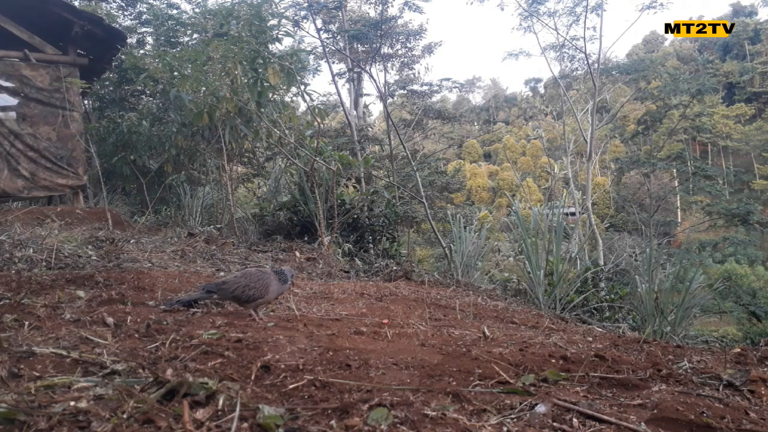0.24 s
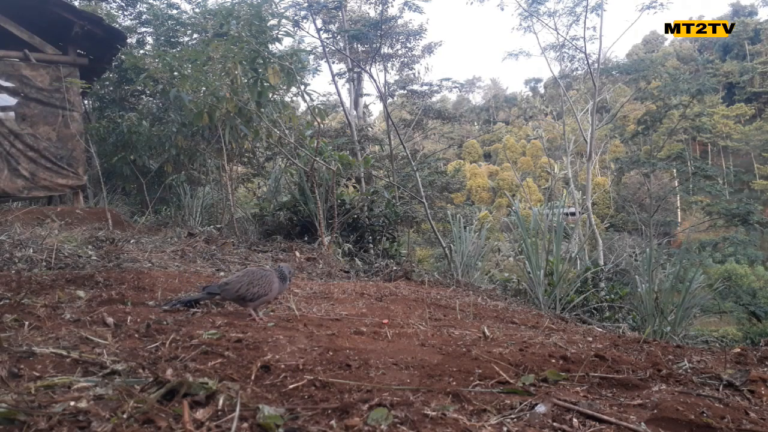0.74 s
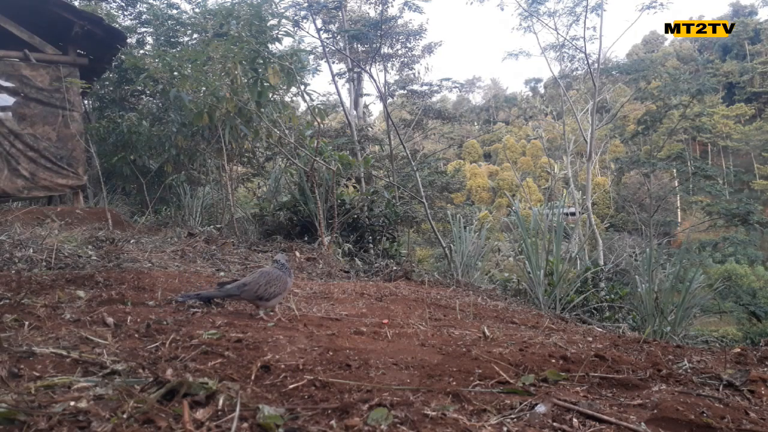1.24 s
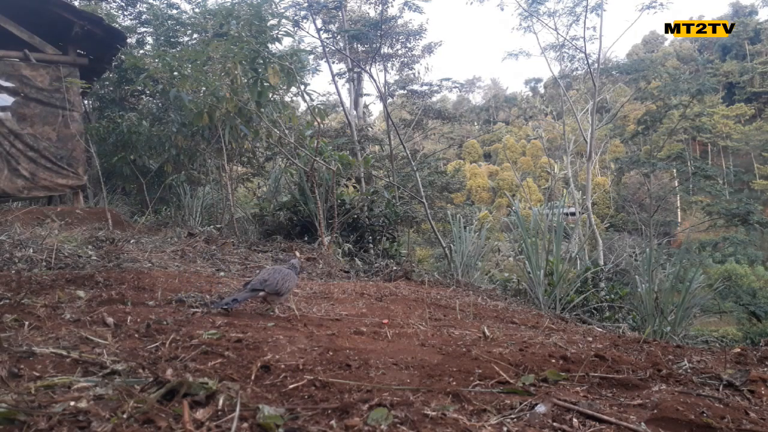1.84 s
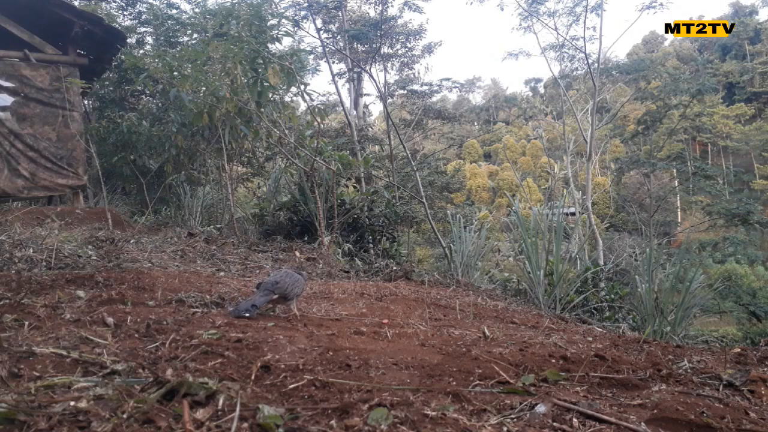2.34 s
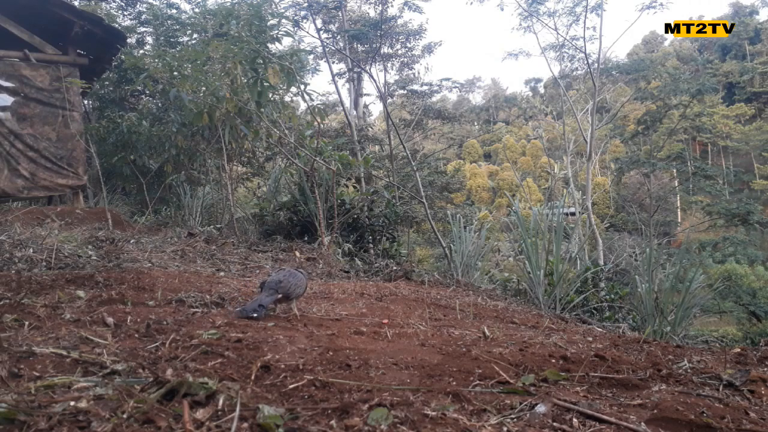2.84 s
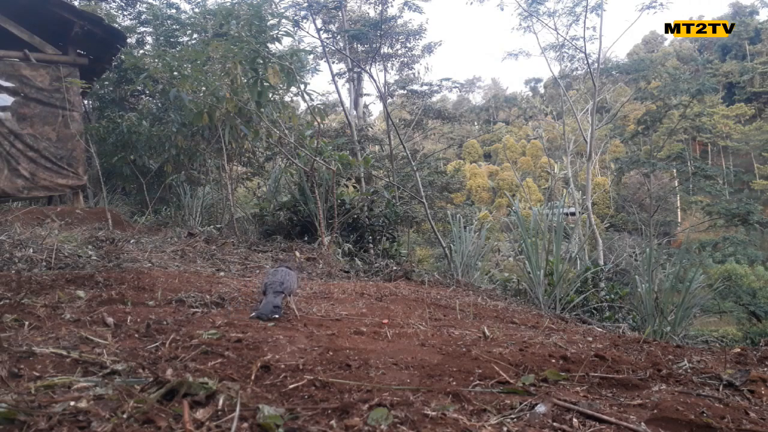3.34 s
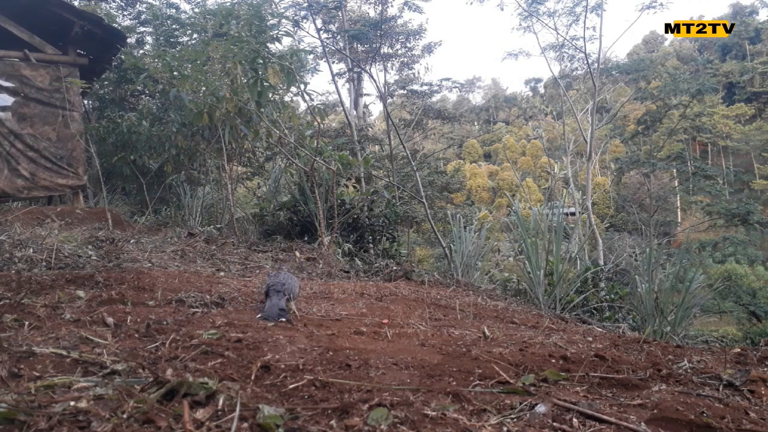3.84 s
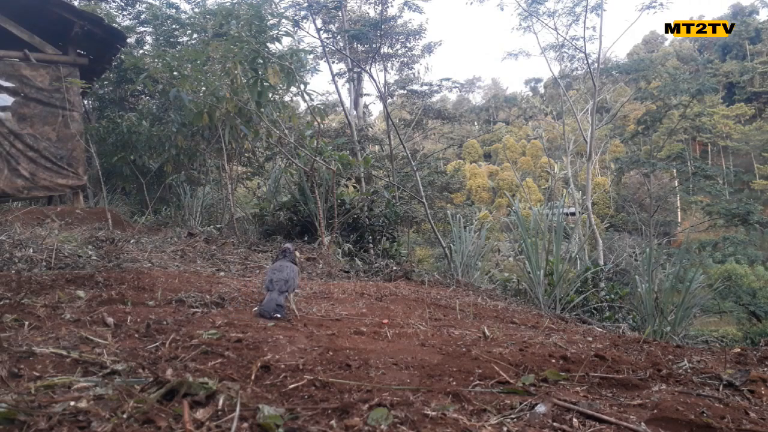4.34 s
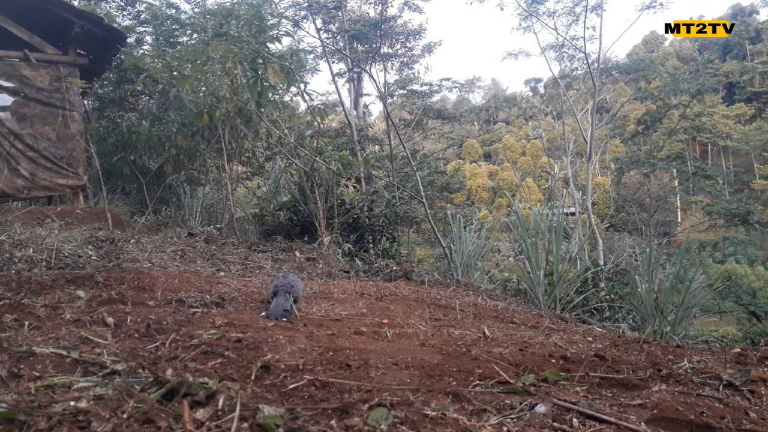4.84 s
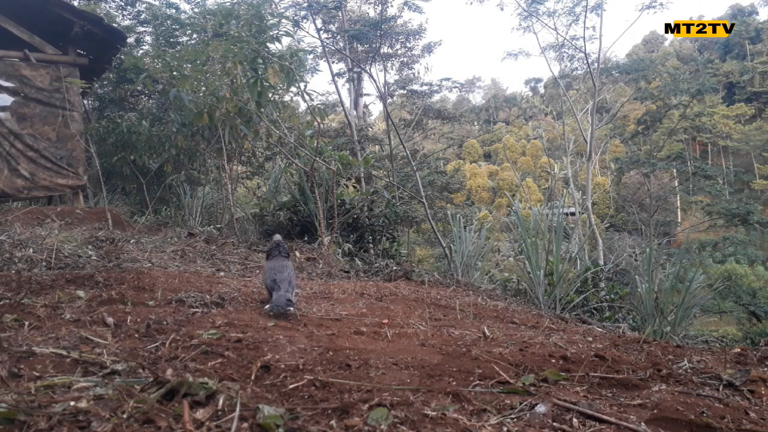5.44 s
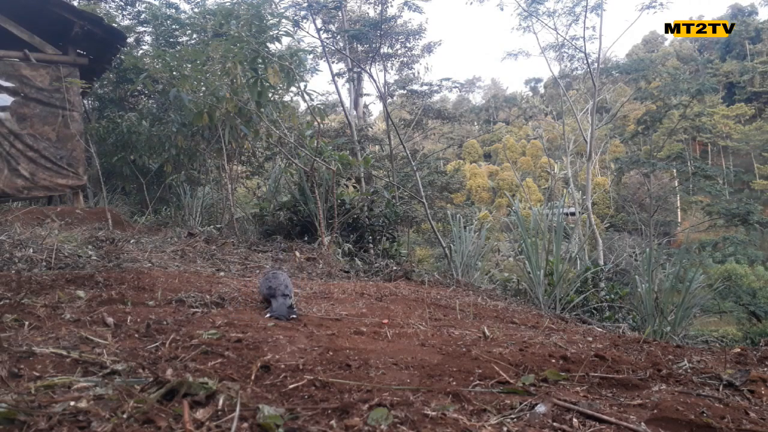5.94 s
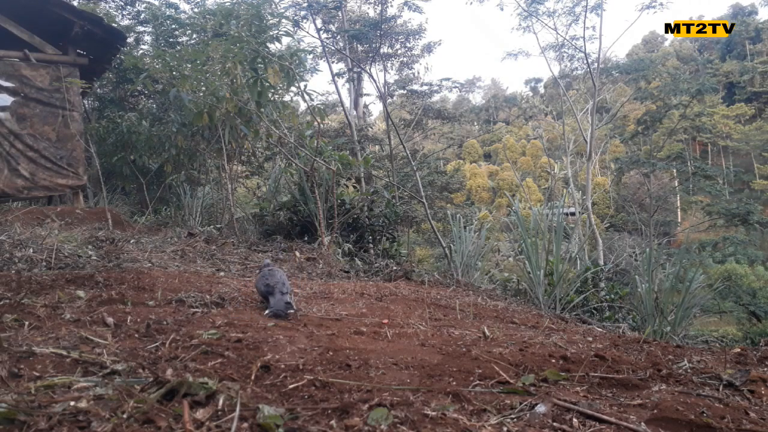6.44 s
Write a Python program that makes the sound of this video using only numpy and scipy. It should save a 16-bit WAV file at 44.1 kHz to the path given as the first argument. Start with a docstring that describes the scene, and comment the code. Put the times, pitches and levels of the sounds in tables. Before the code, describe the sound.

Mellow fluttering dove coos sound near on a quiet wooded hillside, with far doves, thin whistles and trills, buzzing insects and a dying engine putter.

```python
"""On bare ground at the edge of a wooded hillside a dove coos and purrs, with more doves far off.
A distant one-cylinder engine putters, slows and fades; small birds whistle, trill, chirp and pipe.
Insects buzz in the trees, over soft outdoor air. Voices are gliding tones, the engine is a row of
thumps, and insects and air are shaped noise. Scattered echoes set most sources among the trees."""
import sys
import numpy as np
from scipy import signal
from scipy.fft import rfft, irfft
from scipy.io import wavfile

SR = 44100
rng = np.random.default_rng(int(sys.argv[2]) if len(sys.argv) > 2 else 0)


def generate_wav(sig):
    """Save sig (samples, or channels by samples) to the path in sys.argv[1] as 16-bit PCM at SR."""
    pcm = np.round(np.clip(np.atleast_2d(sig).T, -1, 1) * 32767).astype(np.int16)
    wavfile.write(sys.argv[1], SR, pcm)


N = 294588
TIME = np.arange(N) / SR   # seconds

# colour of the open air, relative: (f/Hz, level per Hz/dB)
AIR_COLOUR = [(20, -41), (45, -15.5), (60, -5.5), (80, -11), (150, -2), (240, -2.5), (340, -8.5),
              (560, -0.5), (950, -16), (1250, -20), (1650, -16), (2600, -23.5), (3800, -29), (5500, -32),
              (8500, -37.5), (10500, -45.5), (15000, -40.5)]
# steady insect chorus, one row per resonance: (f/Hz, width/Hz, level/dB)
CHORUS_BANDS = [(3096, 465, -64), (4580, 436, -65), (6340, 800, -72), (9090, 820, -78)]
# resonances of the insect buzz: (f/Hz, width/Hz, relative level/dB)
BUZZ_RESONANCES = [(6290, 510, 3), (7770, 510, -0.5)]
# murmur of far doves, joined by straight lines: (t/s, relative level/dB, f/Hz)
FAR_DOVE_PATH = [(0, -40, 670), (.94, -46.5, 699.7), (1.01, -40, 766), (1.08, -51, 750), (1.3, -45.5, 621),
                 (1.6, -50.5, 629), (1.8, -48, 679), (3.3, -49, 670), (4.4, -46, 666), (5.55, -54, 702.4),
                 (6.68, -55, 658.4)]
# thin notes of the piping bird: (t/s, length/s, relative level/dB)
PIPED_NOTES = [(0.296, 0.03, -58), (0.341, 0.071, -55), (0.452, 0.061, -58), (0.668, 0.042, -58),
               (1.158, 0.08, -55), (1.324, 0.033, -62), (1.987, 0.083, -56), (2.205, 0.028, -57.5),
               (2.248, 0.043, -62), (2.812, 0.078, -56.5), (3.059, 0.05, -56.5), (3.596, 0.112, -56.5),
               (3.717, 0.062, -56.5), (4.401, 0.12, -55), (5.182, 0.049, -56.5), (5.298, 0.09, -57),
               (5.452, 0.041, -60), (5.988, 0.041, -57.5), (6.119, 0.07, -57)]
# runs of the trilling bird: (start t/s, end t/s)
TRILL_RUNS = [(0, 0.28), (.559, 1.15), (1.507, 2.08), (2.48, 3.179), (3.801, 4.36), (4.68, 5.101), (5.4, 6),
              (6.327, 7.5)]
# notes of the whistling bird: (start t/s, held f/Hz, level/dB)
WHISTLE_NOTES = [(0.053, 4000, -51), (.623, 3990, -54.5), (1.185, 3940, -57), (1.795, 3960, -56.5),
                 (2.425, 3964, -55.5), (3.04, 3880, -52.5), (3.783, 3920, -52.5), (4.415, 3905, -57),
                 (5.12, 3855, -53), (6.375, 3915, -55.5)]
# engine exhaust: (t/s, level/dB, share of hillside echo/0-1)
ENGINE_PATH = [(0, -42.5, 0.1), (.28, -42, 0), (.62, -39.5, 0), (1.1, -45, 0.43), (1.52, -41.5, 0.47),
               (1.62, -44.5, 0.32), (1.84, -43, 0.84), (2.3, -48, .8), (3.0, -54.5, 0.8), (4.5, -67, 0.99)]
# engine speed: (t/s, firings per second/Hz)
ENGINE_SPEED = [(0.0, 29.7), (0.35, 30.1), (0.62, 28.9), (0.92, 30.63), (1.15, 29.67), (1.35, 26.68),
                (1.6, 28.89), (2.05, 21.77), (2.6, 16.5)]
# notes of the near dove: (start t/s, length/s, pitch rise/s, pitch fall/s,
#   bend of the fall (under 1 = steep at first), top f/Hz, sag before the fall/Hz, end f/Hz,
#   level/dB, attack/s, fade during the fall/dB, first flutter rate/Hz, last flutter rate/Hz,
#   purr from/s into the note, purr until/s into the note, purr depth/0-1, depth outside the purr/0-1)
COO_NOTES = [(.064, 0.21, 0.12, 0.05, 1.1, 731.5, 35, 527, -15.5, .083, 14, 62.3, 69.8, 0.0058, .088, .86, .06),
             (.409, .42, 0.025, 0.16, .58, 799, 69, 557, -17, 0.024, 8.5, 57.54, 70.1, 0.0029, 0.21, 0.79, 0.1997),
             (2.171, 0.12, 0.046, 0.067, .7, 748.5, 3.85, 573, -18.5, 0.026, 26, 55, 67.7, .034, .11, 0.86, 0.21),
             (2.326, .18, 0.093, 0.025, 1.17, 742.4, 33, 540, -17, .092, 3.5, 69, 73.44, 0.01, 0.1, 0.94, .04),
             (2.634, 0.51, 0.0356, 0.092, 0.67, 755.5, 76, 568, -18, 0.025, 9, 62.1, 106.4, 0.00085, 0.4, .85, 0.2),
             (3.515, .17, 0.038, 0.0258, 0.97, 734, 54, 569.3, -19.5, 0.018, 1, 76.3, 97.2, 0.0036, .153, .97, .15),
             (3.796, 0.37, 0.032, 0.12, 1, 704, 2.17, 605, -18.2, 0.028, 5.5, 117.4, 118.5, 0.0004, 0.19, 0.59, 0.39),
             (4.644, .183, .034, .02, 0.85, 723, 37, 559, -19, .024, 2, 68.8, 94, 0.00096, .15, 0.93, .05),
             (4.937, 0.56, 0.0459, .35, .85, 742.6, 37, 559.5, -18.5, 0.026, 17.5, 68, 73.9, 0.12, .37, 0.45, .2),
             (5.856, 0.17, 0.033, 0.036, 1.26, 716.6, 18.3, 589.3, -20, 0.017, 1, 82.1, 93.8, 0.0049, 0.15, 0.94, 0.76),
             (6.132, 0.55, 0.059, 0.31, 1.05, 736.6, 43, 563, -19, 0.025, 15.8, 65.15, 63.23, 0.13, 0.33, 0.52, .33)]

AIR_DB = -49
FIRST_BUZZ_S, BUZZ_EVERY_S, BUZZ_S = -.28, .815, .61   # evenly spaced bursts
FIRST_CHIRP_S, CHIRP_EVERY_S, CHIRP_DB = .335, .595, -58
TRILL_DB, WHISTLE_S = -63.5, .225
START_HZ = 561.4   # every coo starts here, before the purr pulls its pitch down
SWELL_DB = 2.5   # each coo grows by this much until its fall
RELEASE_S = .013   # the throat shuts
PURR_FADE_S, TREMOR_HZ = .022, 64   # the purr gives way to a shallower tremor
PURR_DRAG_HZ, PURR_LOSS_DB = 45.26, 2   # a full purr lowers pitch and loudness by this much
QUAVER_HZ, QUAVER_GROWS_S = 12.2, .22   # a coo's quaver grows to full over this time
CUTOFF_HZ = 15500


def from_db(db):
    """Turn decibels into gain."""
    return 10 ** (np.asarray(db) / 20)


def rms_one(x):
    """Scale to unit power."""
    return x / np.sqrt(np.mean(x ** 2) + 1e-20)


def in_time(rows):
    """Give one curve per column after the first, joining the rows by straight lines."""
    t, *columns = np.transpose(rows)
    return [np.interp(TIME, t, column) for column in columns]


def band(x, low_hz, high_hz, order=2):
    """Keep the sound between two frequencies."""
    edges_hz = [max(low_hz, 10), min(high_hz, .45 * SR)]
    sos = signal.butter(order, edges_hz, "band", fs=SR, output="sos")
    return signal.sosfilt(sos, x + 1e-18)


def hiss(hz, width_hz):
    """Make noise in one resonance, at unit power."""
    return rms_one(band(rng.standard_normal(N), hz - width_hz / 2, hz + width_hz / 2))


def drift(rate_hz):
    """Wander smoothly at random with a spread of 1, faster for a higher rate."""
    r = np.exp(-40 * np.pi * rate_hz / SR)
    # worked out at every 20th sample; the first 2000 values let the filter settle
    noise = rng.standard_normal(N // 20 + 2002)
    slow = signal.lfilter([1], [1, -2 * r, r * r], noise)[2000:]
    return np.interp(np.arange(N) / 20, np.arange(len(slow)), rms_one(slow))


def turns(hz):
    """Count the cycles completed at a changing frequency."""
    return np.cumsum(hz) / SR


def woods(x, t60):
    """Trunks and slopes scatter thin echoes that die by 60 dB in t60 seconds."""
    t = TIME[:SR]
    scattered = rng.standard_normal(SR) * (rng.random(SR) < 900 / SR)   # about 900 echoes
    echoes = scattered * (t > .015) * from_db(-60 * t / t60)
    return signal.fftconvolve(x, echoes / np.sqrt(np.sum(echoes ** 2)))[:N]


def air(engine_hiss_db=-17, hiss_hz=1700, hiss_width_hz=1700):
    """Coloured noise gives a soft rumble and hiss; the engine's own hiss sinks as it slows and fades."""
    hz, db = np.transpose(AIR_COLOUR)
    bin_hz = np.arange(N // 2 + 1) * SR / N
    colour = from_db(np.interp(np.log(bin_hz + 1), np.log(hz), db))
    steady = from_db(AIR_DB) * rms_one(irfft(rfft(rng.standard_normal(N)) * colour, N))
    rate, level_db = in_time(ENGINE_SPEED)[0], in_time(ENGINE_PATH)[0]
    engine_level = from_db(level_db + engine_hiss_db) * (rate / rate.max()) ** 2
    return steady + engine_level * hiss(hiss_hz, hiss_width_hz)


def insects(buzz_db=-69, climb_hz=300, throb_hz=57, throb_depth=0.098):
    """A throbbing noise swells and climbs in bursts, low between them, over a steady chorus."""
    age = (TIME - FIRST_BUZZ_S) % BUZZ_EVERY_S
    part = age / BUZZ_S * (age < BUZZ_S)   # 0 to 1 through a burst, 0 between bursts
    swell = np.interp(part, [0, .3, .85, 1], [0.35, 0.74, 0.77, 0.2])
    resonances = sum(from_db(db) * hiss(hz, width) for hz, width, db in BUZZ_RESONANCES)
    # this slides all the frequencies up together
    climb = np.exp(2j * np.pi * turns(climb_hz * (part - .5)))
    buzz = np.real(climb * signal.hilbert(resonances))
    throb_phase = 2 * np.pi * turns(throb_hz * (1 + .03 * drift(5.8)))
    throb = 1 + throb_depth * np.sin(throb_phase)
    chorus = sum(from_db(db) * hiss(hz, width) for hz, width, db in CHORUS_BANDS)
    return from_db(buzz_db) * swell * buzz * throb + chorus


def far_doves(flutter_hz=66, depth=1.0, wander=0.0254, gain_db=-1):
    """A fluttering tone with wandering pitch makes a purr from far away, blurred by the trees."""
    level_db, pitch = in_time(FAR_DOVE_PATH)
    flutter = turns(flutter_hz * (1 + 0.1655 * drift(26)))
    purr = 1 + depth * np.sin(2 * np.pi * flutter)
    voice = purr * np.sin(2 * np.pi * turns(pitch * (1 + wander * drift(31.7))))
    return from_db(level_db + gain_db) * rms_one(voice + woods(voice, t60=0.64))


def piper(hz=1463, waver_hz=8, gain_db=3, edge_s=0.011, fundamental_db=-14, thread_db=-69, echo_db=-6):
    """Short notes on one pitch, strongest in their octave, over a faint wavering thread of that tone."""
    level = np.zeros(N)
    for start, length, db in PIPED_NOTES:
        inside_s = length / 2 - abs(TIME - start - length / 2)   # time from the nearer end
        level += from_db(db + gain_db) * np.clip(.5 + inside_s / edge_s, 0, 1)
    level = level + from_db(thread_db + 2.9 * drift(11))
    phase = 2 * np.pi * turns(hz + waver_hz * drift(40.8))
    notes = level * (np.sin(2 * phase) + from_db(fundamental_db) * np.sin(phase))
    return notes + from_db(echo_db) * woods(notes, t60=1.0)


def chirper(count=6, length_s=0.069, low_hz=2400, high_hz=3300, echo_db=-8):
    """A rising, quavering tone makes quick chirps at an even pace, deep in the trees, then stops."""
    out = np.zeros(N)
    for start in FIRST_CHIRP_S + CHIRP_EVERY_S * np.arange(count):
        part = np.clip((TIME - start) / length_s, 0, 1)
        hz = low_hz + (high_hz - low_hz) * part + 130 * np.sin(5 * np.pi * part)
        out += from_db(CHIRP_DB) * np.sin(np.pi * part) * np.sin(2 * np.pi * turns(hz))
    return out + from_db(echo_db) * woods(out, t60=0.48)


def triller(chips_hz=18.6, centre_hz=4690, sweep_hz=120, rasp_hz=160, echo_db=-6):
    """Runs of quick, falling chips grow louder, raspy from a jittery pitch and smeared by distance."""
    chip = turns(chips_hz * (1 + .02 * drift(3))) % 1   # 0 to 1 through each chip
    level = np.zeros(N)
    for start, end in TRILL_RUNS:
        points = [start - .03, start, (start + end) / 2, end - .02, end]
        level += np.interp(TIME, points, [0, 0.72, 0.97, 0.99, 0])
    hz = centre_hz + sweep_hz * (2 - 4 * chip) + rasp_hz * drift(200)
    shape = np.sin(np.pi * chip) ** 2 * (1 + .5 * np.cos(6 * np.pi * chip + np.pi))
    song = level * rms_one(shape * np.sin(2 * np.pi * turns(hz)))
    return from_db(TRILL_DB) * (song + from_db(echo_db) * woods(song, t60=.5))


def whistler(start_hz=3250, waver_hz=18, flick_hz=60, glide_s=.028, echo_db=-9):
    """Each whistle slides up faintly, swells on a held pitch and ends with an upward flick."""
    out, waver = np.zeros(N), waver_hz * drift(43)
    for start, held_hz, level_db in WHISTLE_NOTES:
        now = (TIME >= start) & (TIME < start + WHISTLE_S)
        age = TIME[now] - start
        part = age / WHISTLE_S
        slide = (held_hz - start_hz) / (1 + (age / glide_s) ** 3)   # still to climb
        hz = held_hz - slide + flick_hz * part ** 14 + waver[now]
        swell = np.interp(part, [0, .1, .22, .5, .92, 1], [0, .45, .22, .7, 1, 0])
        out[now] += from_db(level_db) * swell * np.sin(2 * np.pi * turns(hz))
    return out + from_db(echo_db) * woods(out, t60=1.0)


def engine(low_hz=150, high_hz=305, uneven_db=1.5, rasp_db=-12, boom_hz=126, echo_s=0.01174, tail_db=-13):
    """Each firing is one dull exhaust thump; the hillside sends it back, deeper, a little later."""
    level_db, echo = in_time(ENGINE_PATH)
    # one click each time a firing is completed
    firing = np.diff(np.floor(turns(in_time(ENGINE_SPEED)[0]) + .36), prepend=0)
    firing = firing * from_db(uneven_db * drift(27))
    thump = -rms_one(band(band(firing, low_hz, high_hz), 63, 370))
    rasp = rms_one(band(firing, 320, 650, order=3))
    # the louder the engine, the raspier it is
    direct = thump + from_db(rasp_db + level_db - level_db.max()) * rasp
    deeper = thump - rms_one(band(firing, boom_hz - 17, boom_hz + 17))
    delay_s = echo_s * (1 + 0.078 * drift(1.5))
    late = np.interp(TIME - delay_s, TIME, deeper)
    heard = direct + echo * late + from_db(tail_db) * woods(direct, t60=1.0)
    return from_db(level_db) * heard / np.sqrt(1 + echo ** 2)


def coo_controls():
    """Each note slides up, sags as it swells, then falls and fades; part of it breaks into a purr."""
    pitch, loudness = np.full(N, float(START_HZ)), np.zeros(N)
    rate, depth = np.full(N, float(TREMOR_HZ)), np.zeros(N)
    quaver = QUAVER_HZ * drift(35)
    for (start, length, rise, fall, bend, top_hz, sag_hz, end_hz, level_db, attack, fade_db,
         first_rate, last_rate, purr_from, purr_until, purr_depth, calm_depth) in COO_NOTES:
        now = (TIME >= start) & (TIME < start + length)
        age = TIME[now] - start
        crest = max(length - fall, rise)   # when the fall begins
        swelling = np.minimum(age / crest, 1)
        falling = np.clip((age - crest) / fall, 0, 1)
        held_hz = np.interp(age, [0, rise, crest], [START_HZ, top_hz, top_hz - sag_hz])
        quavering = quaver[now] * np.minimum(age / QUAVER_GROWS_S, 1) * (1 - falling)
        pitch[now] = held_hz + (end_hz - held_hz) * falling ** bend + quavering
        gate = np.clip(np.minimum(age / attack, (length - age) / RELEASE_S), 0, 1)
        loudness[now] = gate * from_db(level_db + SWELL_DB * (swelling - 1) - fade_db * falling ** 2)
        purring = np.clip(.5 + np.minimum(age - purr_from, purr_until - age) / PURR_FADE_S, 0, 1)
        purr_rate = np.interp(age, [purr_from, purr_until], [first_rate, last_rate])
        rate[now] = purring * purr_rate + (1 - purring) * TREMOR_HZ
        depth[now] = purring * purr_depth + (1 - purring) * calm_depth
    return pitch, loudness, rate, np.clip(depth, 0, 1)


def dove(jitter=.032, uneven=0.2117, rise=0.32, sag=.13, waver=0.0097, second_db=-52, third_db=-58):
    """A nearly pure tone, chopped into a purr by a fluttering valve in the throat."""
    pitch, loudness, rate, depth = coo_controls()
    # a shallow flutter is less regular than a full one, and each note starts it afresh
    flutter = turns(rate * np.exp(jitter * (5 - 4 * depth) * drift(40)))
    flutter = flutter - np.maximum.accumulate(flutter * (loudness == 0))
    depth = np.clip(depth * (1 + uneven * (3 - 2.696 * depth) * drift(66)), 0, 1)
    puff, part = flutter.astype(int), flutter % 1   # puff number, and place within it
    shut = np.cos(np.pi * part) ** 2
    # the divisor keeps the average power even at any depth
    opening = (1 - depth * shut) / np.sqrt(1 - depth + 3 / 8 * depth ** 2)
    # the pitch climbs through each puff and sags as the valve closes
    bend = depth * (rise * (part - .5) - sag * (shut - .25))
    hz = (pitch - PURR_DRAG_HZ * depth) * (1 + bend + waver * drift(130))
    # each closure makes the tone stumble by part of a cycle, more so late in a long, slowly fluttered note
    closure = np.cumsum(np.diff(part > .5, prepend=0) > 0)
    slip = rng.uniform(-.5, .5, N)[closure]
    slip = slip * np.clip(puff / 12, .3, 1) * np.minimum(85 / rate, 1) + .14 * drift(6)
    near_shut = shut ** 4 / np.mean(shut[loudness > .01] ** 4)
    stumble_hz = slip * np.minimum(1.4 * depth, 1) * rate * near_shut
    phase = 2 * np.pi * turns(hz + stumble_hz)
    # the inflated crop passes the fundamental and little else
    voice = band(opening * np.sin(phase), 552, 1500, order=3)
    overtones = from_db(second_db) * np.sin(2 * phase) + from_db(third_db) * np.sin(3 * phase)
    return loudness * from_db(-PURR_LOSS_DB * depth) * (voice + opening * overtones)


def scene(echo_db=-32):
    """Put the near dove, with very little echo, in front of the hillside sounds."""
    background = air() + insects()
    birds = far_doves() + piper() + chirper() + triller() + whistler()
    coo = dove()
    near = coo + from_db(echo_db) * woods(coo, t60=0.96)
    return (background + birds + engine() + near)[None]


def record(dry):
    """Cut the highest treble steeply."""
    return signal.sosfilt(signal.ellip(10, .1, 80, CUTOFF_HZ, fs=SR, output="sos"), dry)


dry = scene()
out = record(dry)
generate_wav(out)
```